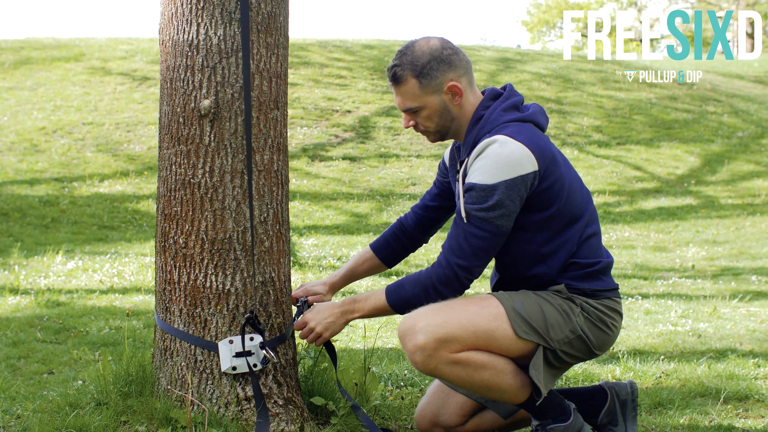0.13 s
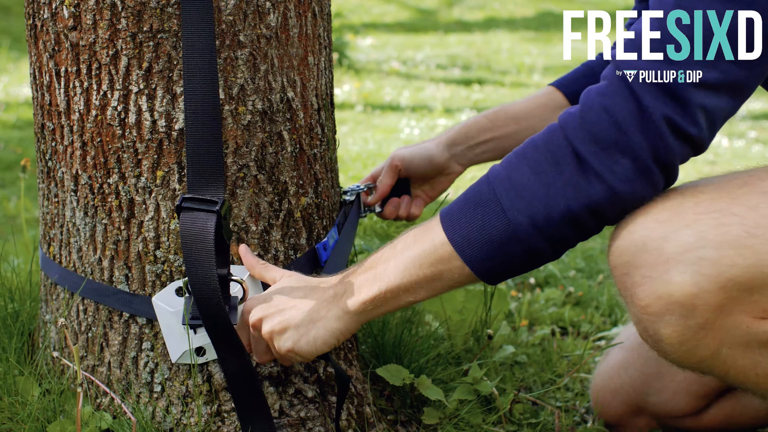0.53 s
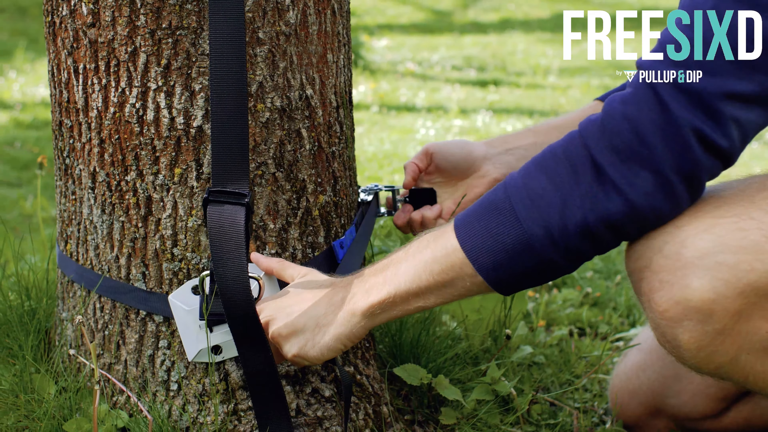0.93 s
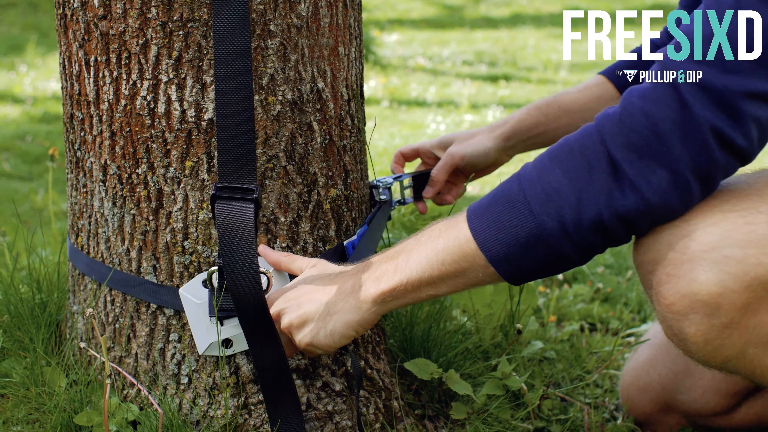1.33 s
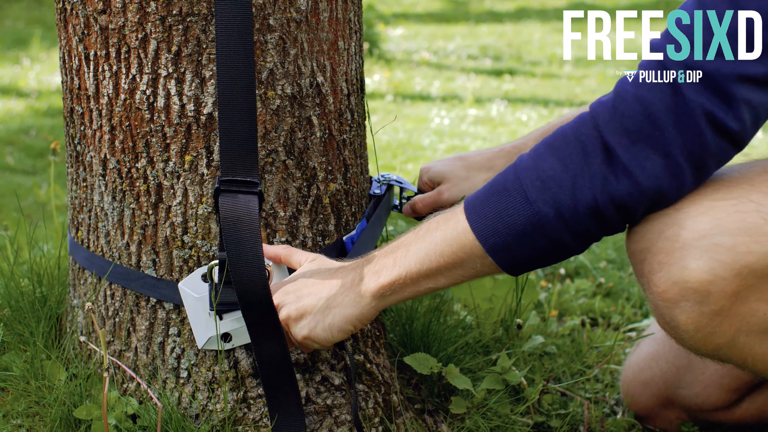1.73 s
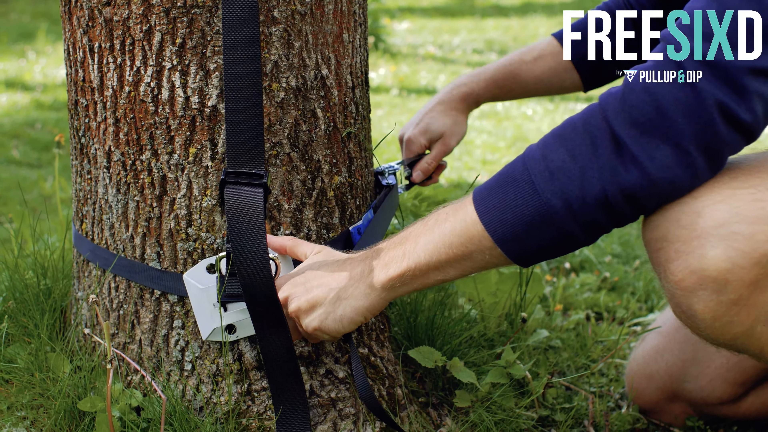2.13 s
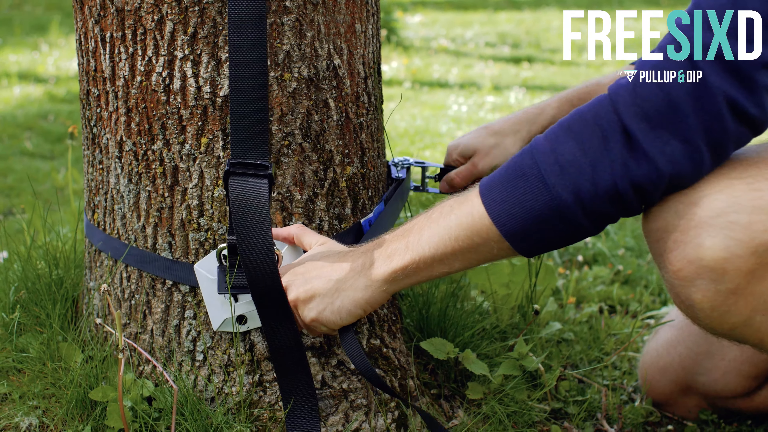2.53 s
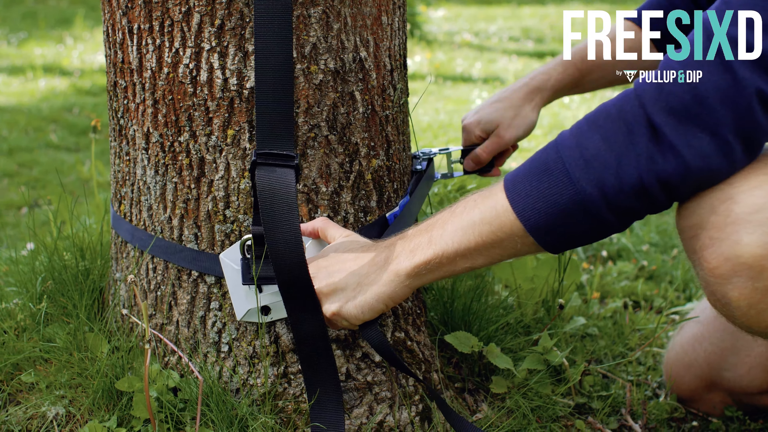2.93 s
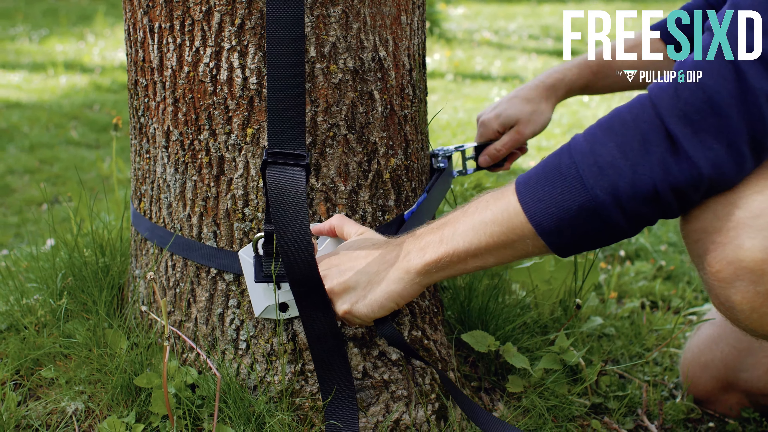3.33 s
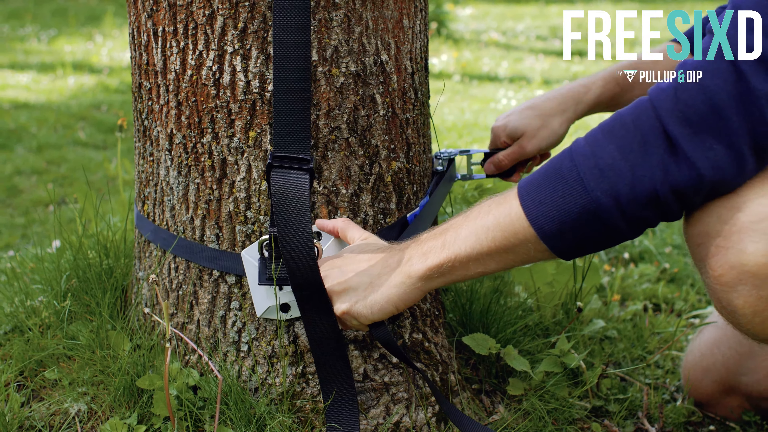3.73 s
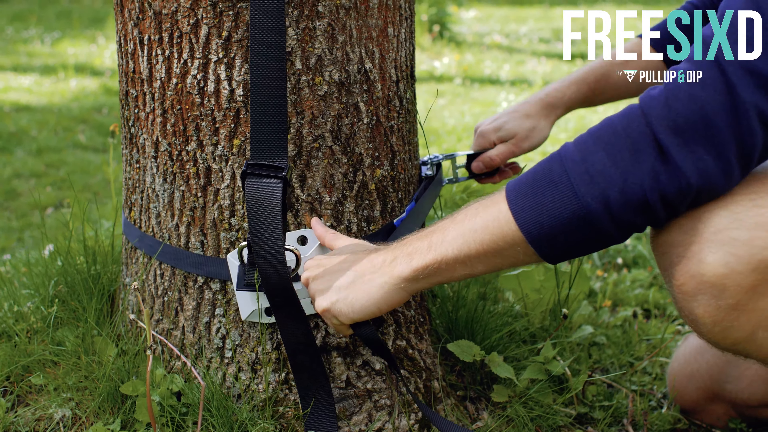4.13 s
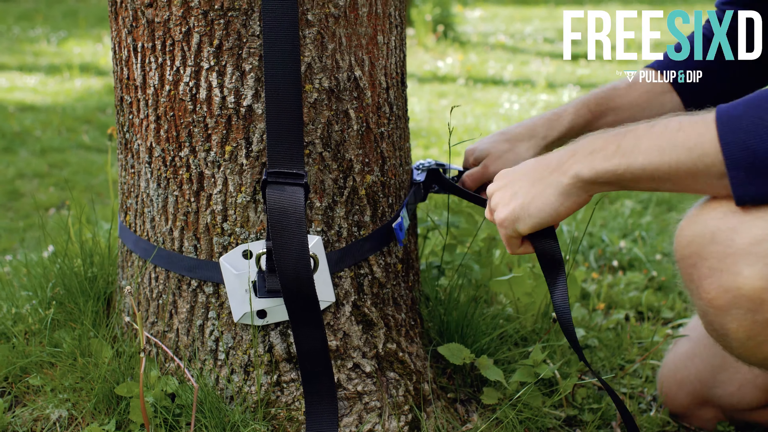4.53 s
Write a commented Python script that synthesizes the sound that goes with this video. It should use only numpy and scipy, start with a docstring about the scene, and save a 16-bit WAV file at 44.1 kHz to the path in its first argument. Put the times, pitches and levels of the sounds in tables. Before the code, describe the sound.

A steel ratchet tightens a webbing strap round a tree trunk on a lawn. Faint ticks come first, then sharp, rattling clicks in short bursts, about three a second, with a few brief squeaks from the dry pivot. The clicking thins to softer clicks and finger knocks near the end. The ratchet sounds close, over quiet strap rustle, soft handling thumps, low wind on the microphone and a distant hum.

```python
"""A steel ratchet is cranked on a webbing strap round a tree trunk, outdoors on a lawn.
Distant hum, wind rumble, soft thumps of puffs and handling, and rustling webbing run throughout.
Faint ticks come first; a loose metal part tinks at 0.8 s, then the pawl snaps over the teeth in short
rattling bursts. From 2.7 s the dry pivot squeaks now and then. Fingers knock on the strap at 3.6 s;
the part tinks again at 4.4 s. Near 5 s the wind swells; soft clicks, knocks and a squeak follow."""
import sys
import numpy as np
from scipy import signal
from scipy.fft import rfft, irfft, next_fast_len
from scipy.io import wavfile
from scipy.ndimage import uniform_filter1d

SR = 44100
rng = np.random.default_rng(int(sys.argv[2]) if len(sys.argv) > 2 else 0)


def waveform_to_disk(signal):
    """Save audio, clipped to [-1, 1], as 16-bit WAV at the path in sys.argv[1]."""
    frames = np.transpose(np.atleast_2d(signal))
    scaled = np.clip(frames, -1, 1) * 32767
    samples = np.round(scaled).astype(np.int16)
    wavfile.write(sys.argv[1], SR, samples)


N = 246466


def amp(db):
    """Decibels to gain."""
    return 10 ** (np.asarray(db) / 20)


def rms_one(x):
    """Scale to unit rms."""
    return x / np.sqrt(np.mean(x ** 2) + 1e-20)


def level(rows, column=1):
    """One dB column of a (seconds, dB, ..) curve as gain per sample."""
    columns = np.transpose(rows)
    return amp(np.interp(np.arange(N) / SR, columns[0], columns[column]))


def shape(spectrum, hz):
    """Gain of a (Hz, dB) spectrum at given frequencies."""
    knots_hz, db = np.transpose(spectrum)
    return amp(np.interp(np.log(np.maximum(hz, 1)), np.log(knots_hz), db))


def coloured(noise, spectrum):
    """Noise filtered to a (Hz, dB) spectrum; unit rms."""
    size = next_fast_len(N)
    gain = shape(spectrum, np.fft.rfftfreq(size, 1 / SR))
    return rms_one(irfft(rfft(noise, size) * gain, size)[:N])


def drift(corner_hz, count=N):
    """Random wander: noise through two one-pole low-passes; unit rms."""
    r = np.exp(-2 * np.pi * corner_hz / SR)
    noise = rng.standard_normal(count + SR // 2)
    return rms_one(signal.lfilter([1], [1, -2 * r, r * r], noise)[SR // 2:])


def ring(x, hz, t60_s):
    """Damped mode: a unit click starts a decaying unit sine."""
    r = amp(-60 / (t60_s * SR))
    w = 2 * np.pi * min(hz, .45 * SR) / SR
    return signal.lfilter([0, np.sin(w)], [1, -2 * r * np.cos(w), r * r], x + 1e-18)


def open_air():
    """Distant hum and hiss, wavering slightly."""
    # Hum over time. Each row: time in seconds, level in dB.
    hum_levels = [(0, -55), (.92, -51), (1.67, -53), (3.08, -53), (3.8, -52), (5.07, -53.5), (5.59, -52)]
    # Hum spectrum. Each row: frequency in Hz, relative density in dB.
    hum_spectrum = [(13, -54.5), (22, -25.5), (149, -1.5), (415, -3), (721, -3.5), (1010, -5), (1520, -15),
                    (4370, -33), (13200, -41.5), (15200, -44.5), (16500, -53.5)]
    return level(hum_levels) * amp(0.88 * drift(12.0)) * coloured(rng.standard_normal(N), hum_spectrum)


def wind_and_handling(thump_sigma_s=0.019, gust_spread_db=0, flutter_db=0.5):
    """Low wind rumble on the microphone, with short soft thumps from puffs and from handling the ratchet."""
    # Wind strength. Each row: time in seconds, level in dB.
    gust_levels = [(0, -58), (.5, -61), (1.3, -57), (2.5, -60), (3.05, -58.5), (3.5, -46.5), (3.95, -56),
                   (4.45, -52.5), (4.7, -47), (5.05, -42.5), (5.2, -52), (5.4, -46), (5.59, -47.5)]
    # Wind puffs and handling thumps. Each row: centre in seconds, level in dB.
    thump_levels = [(.16, -54), (.54, -57), (.78, -43.5), (1.19, -54), (1.63, -53), (1.91, -60),
                    (2.02, -56), (2.13, -51), (2.211, -44.5), (2.35, -45), (2.664, -41), (2.75, -48.5),
                    (3.17, -58), (3.27, -56), (3.35, -42.5), (3.67, -48), (4.055, -52.5), (4.266, -51),
                    (4.52, -59), (4.565, -49), (4.69, -45), (5.01, -49.5), (5.354, -33.5), (5.45, -45)]
    # Rumble spectrum. Each row: frequency in Hz, relative density in dB.
    rumble_spectrum = [(18, -60), (30, -30.5), (104, -3), (130, 1), (241, 0), (335, -7.5), (367, -11.5),
                       (510, -12.5), (700, -22), (910, -52), (1540, -120)]
    t = np.arange(N) / SR
    thumps = sum(amp(db) * np.exp(-.5 * ((t - s) / thump_sigma_s) ** 2) for s, db in thump_levels)
    gusts = level(gust_levels) * amp(gust_spread_db * drift(4.9))
    flutter = amp(flutter_db * drift(42))
    return (gusts + thumps) * flutter * coloured(rng.standard_normal(N), rumble_spectrum)


def webbing():
    """Rubbed fibres: a dull grainy scrape and a smoother bright hiss flutter together."""
    # Rustle over time. Each row: time in seconds, scrape in dB, hiss in dB.
    rustle_levels = [(0, -67.5, -67.5), (.3, -67, -72.5), (.72, -69.5, -74), (1.01, -65, -71),
                     (1.15, -70.5, -77), (1.28, -60, -64), (1.43, -67.5, -73), (2.25, -64, -71),
                     (2.35, -54, -69), (2.55, -58.5, -66), (2.72, -65.5, -72.5), (3.11, -69, -73),
                     (3.72, -68.5, -74), (3.85, -60.5, -67.5), (4.1, -65, -67.5), (4.3, -60.5, -65.5),
                     (4.67, -65, -69), (4.95, -71, -73), (5.21, -65, -74.5), (5.59, -58.5, -68)]
    # Scrape and hiss spectra. Each row: frequency in Hz, relative density in dB.
    scrape_spectrum = [(1300, -22.5), (2000, 0.5), (2500, 0.5), (3100, -0.5), (4000, -1), (4800, -2),
                       (5600, -7), (7500, -29.5)]
    hiss_spectrum = [(4000, -30), (5800, 4), (6600, 1.5), (10000, -4.5), (14500, -6.5), (16000, -13),
                     (16600, -33.5)]
    scrape = coloured(rng.standard_normal(N) * amp(2.9 * drift(320)), scrape_spectrum)
    hiss = coloured(rng.standard_normal(N) * amp(1.49 * drift(300)), hiss_spectrum)
    flutter = amp(0.81 * drift(30))
    return flutter * (level(rustle_levels, column=1) * scrape + level(rustle_levels, column=2) * hiss)


def finger_knocks():
    """Fingers on the strap: each dull knock swells and dies in a cycle or two."""
    # Each row: time in seconds, peak in dB, pitch in Hz.
    knocks = [(3.6225, -31.5, 870), (3.6263, -37, 450), (3.6305, -37, 1200), (3.648, -40, 900),
              (3.671, -42, 169), (3.694, -33, 230), (5.2767, -30, 905), (5.2800, -31, 1110),
              (5.3357, -36, 229), (5.407, -39, 1600), (5.4417, -27, 237)]
    out = np.zeros(N)
    for s, db, hz in knocks:
        reach = round(2 * SR / hz)
        at = round(s * SR) + np.arange(-reach, reach)
        cycles = (at / SR - s) * hz - .5
        out[at] -= amp(db) * np.cos(2 * np.pi * cycles) * np.exp(-(cycles / 0.57) ** 2)
    return out


def loose_part(scuff_t60_s=0.0012):
    """Light scuffing touches ring a thin metal part in a few clear modes."""
    # Each entry: time of a touch in seconds.
    tinks_s = [0.8345, 4.4135]
    # Each row: mode in Hz, t60 in seconds, strength in dB in the first tink, in the second.
    modes = [(2646, 0.05, -37, -38.5), (3100, 0.44, -67, -53.5), (5170, 0.085, -42.5, -35.5),
             (5370, 0.029, -36, -70.5), (6050, 0.1, -40, -64), (6640, 0.023, -43, -76),
             (7160, 0.1, -68, -53.5), (7400, .15, -63, -61), (9760, 0.053, -61, -54)]
    t = np.arange(300) / SR
    scuff = amp(-60 * t / scuff_t60_s)
    out = np.zeros(N)
    for hz, t60_s, *strength_db in modes:
        touches = np.zeros(N)
        touches[[round(s * SR) for s in tinks_s]] = amp(strength_db)
        swing = np.cos(2 * np.pi * hz * t) * scuff   # finite contact: the ring swells in
        force = signal.lfilter(2 * swing / scuff.sum(), [1], touches)
        out += ring(force, hz, t60_s) * amp(2.3 * drift(150))
    return out


def pivot(swell_db=25):
    """Stick-slip in the dry pivot: wavering harmonics and friction hiss swell and fade."""
    # Each row: start, loudest moment and end in seconds, slip rate in Hz at each of the three,
    # gain in dB, roughness in dB, relative hiss in dB.
    squeaks = [(2.660, 2.668, 2.676, 3020, 2700, 2800, -16, 4.5, -28),
               (3.986, 3.999, 4.027, 2060, 2180, 2530, -33, 5.5, -23),
               (4.558, 4.576, 4.586, 1690, 1634, 2100, -29.5, 1.5, -15),
               (5.314, 5.332, 5.354, 2560, 2420, 2240, -21, 2, -24)]
    # Each row: relative levels in dB of harmonics 1-8 of one squeak.
    harmonics_db = [ (-16.5, 2, -26.5, -6, -19.5, -31, -42.5, -39),
                    (-42, 2.5, -28, -7.5, -31, -19, -30, -30.5), (-19, -7.5, -9, 0, -1, -6, -8, -15),
                    (-41, 2, -25, -13, -31, -28, -39, -37.5), ]
    out = np.zeros(N)
    for squeak, levels_db in zip(squeaks, harmonics_db):
        start_s, loudest_s, end_s, start_hz, loudest_hz, end_hz, gain_db, rough_db, hiss_db = squeak
        at = np.arange(round(start_s * SR), round(end_s * SR))
        off_peak = np.interp(at / SR, [start_s, loudest_s, end_s], [1, 0, 1]) ** 2
        edge_hz = np.where(at / SR < loudest_s, start_hz, end_hz)
        slip_hz = loudest_hz + off_peak * (edge_hz - loudest_hz)
        jitter = 1 + 0.0042 * rough_db * drift(300, len(at))
        phase = 2 * np.pi * np.cumsum(slip_hz * jitter) / SR
        tone = np.zeros(len(at))
        for k, db in enumerate(levels_db, start=1):
            strength = amp(db + rough_db * drift(196, len(at)))
            tone += strength * np.sin(k * phase + rng.uniform(0, 2 * np.pi))
        hiss = amp(hiss_db) * np.diff(rng.standard_normal(len(at) + 1))
        envelope = signal.windows.tukey(len(at), .15) * amp(gain_db - swell_db * off_peak)
        out[at] += envelope * (tone + hiss)
    return out


def pawl(rise_sigma_ms=1.06, crack_db=-6, rattle_db=-28, rattle_t60_s=0.082, low_cut_hz=1870):
    """Each snap over a tooth is a swarm of tiny steel contacts that rings the frame."""
    # Each row: time in seconds, peak in dB, low-band gain in dB, low ring in Hz,
    # high-band gain in dB, main ring in Hz, contact t60 in ms.
    snaps = [(.0923,-50,-7,2580,7,6600,16),(.1029,-53,-7,2100,-3,4760,16),(.16,-50,-10,2580,-13,4950,16),(.194,-43,-16,2400,1,10800,8),
             (.2477,-50,2,3210,-4,5080,18),(.2764,-49,5,3100,-15,4250,23),(.3056,-48,2,2800,-3,4500,27),(.3688,-49,7,2750,-10,4180,8),
             (.4496,-43,12,2720,0,3780,40),(.4941,-46,1,2510,-10,4670,11),(.6685,-48,9,3110,-6,5300,35),(.9118,-48,-9,2140,-5,8370,35),(.917,-39,-12,2480,4,6750,11),
             (.955,-19.5,-7,2470,1,6760,5.4),(0.9633,-8,-5.5,2550,3.5,6500,10),(0.9663,-8,-10.5,2630,5,5000,11.6),(.9993,-39,-2,2650,-13,4710,35),
             (1.0064,-30,-3,2730,-4.5,4780,12),(1.014,-38,-6,2310,-16,4770,9),(1.0346,-23,-6,2630,-3,6750,20),(1.0425,-9.5,-6,3330,11,6530,14),
             (1.0453,-2,-9.5,2740,-6.5,6710,11),(1.0984,-43,0,2550,-26,4700,13),(1.194,-42.5,-10,2810,-1,4680,16),(1.2103,-42.5,-7,3050,-11,4800,19),
             (1.2361,-33,-5,2870,-2.5,5190,35),(1.2506,-31,-4,2810,-1,4650,16),(1.2592,-30,-5,2180,-5,4650,16),(1.291,-38.5,7.5,2570,3,5000,45),
             (1.338,.5,-9,2830,3,4720,12.3),(1.408,-31,-4,2580,-2,3960,23),(1.421,-37,-3,2560,7,6230,33),(1.4459,-15.5,-8,2440,0,4830,11),
             (1.4477,-10,0.5,2370,2,9200,11),(1.451,-11.5,-1.5,2300,6,8600,13),(1.509,-33.5,-3,2120,1,7260,14),(1.5402,-27.5,1,2530,-7,6160,14),
             (1.5485,-27,-6,2530,-4,6740,34),(1.648,-18.5,-0.5,1960,4.5,4800,31),(1.655,-7.5,-4,2240,0,7800,16),(1.731,-42,13,2140,-19,4450,32),
             (1.7429,-13.5,0,3270,3.5,4840,9.2),(1.748,-16.5,-4,3270,-8,4590,14),(1.7597,-14.5,-12.5,2530,-8,4600,16),(1.873,-28,-3.5,3120,-7,4760,18),
             (1.8847,-35.5,1,3300,1,4300,8),(1.898,-35,-3,2160,-7,4740,8),(1.903,-39,6,3300,-2,4730,15),(1.9858,-12.5,-3.5,2630,3,4970,16),
             (1.9897,-15,-2,2570,2,4820,9.8),(1.9956,-11,-3,2500,0,10900,26),(2.028,-39,5,3290,-15,4860,21),(2.059,-11,-6.5,2160,1,5430,14),
             (2.0623,-7,-2.5,2220,-1,10420,28),(2.2453,-38,1.5,2490,-1,7840,17),(2.2744,-44,9,2440,-4,4760,35),(2.286,-36.5,7,2700,1,4300,24),(2.2967,-25,-4,2360,-4,9200,31),
             (2.319,-35.5,6,2360,0,7560,35),(2.3286,-33.5,6,2450,-11,4800,25),(2.339,-29,4,2500,-19,6100,16),(2.344,-19,-8,2510,-13,6330,16),
             (2.3473,-15.5,-3,2730,9,7600,9.8),(2.3497,-5.5,-6,2740,2.5,7600,16),(2.3794,-45,6,2110,-16,4760,22),(2.41,-27.5,10,2640,-15,4690,25),(2.42,-11,-6.5,2830,3.5,7960,12),
             (2.4272,-16.5,-11,2970,-7,4440,15),(2.528,-34.5,-5,2430,-10,4690,20),(2.541,-38,-3,3200,-10,4510,16),(2.549,-38.5,11,2130,0,6270,17),
             (2.571,-33.5,-6,2250,-1,4900,11.5),(2.5796,-41.5,-4,2500,-16,4630,10),(2.6477,.5,-8,2100,-1.5,8570,11.6),(2.6561,-23,-2.5,2160,-1.5,5880,16),
             (2.692,-2.5,-1.5,2650,2.5,10100,13),(2.7995,-44,12.5,3140,-17.5,3520,6.4),(2.876,-51,-8,2500,-5,4700,8.4),(2.92,-46.5,-6,2150,-1,5970,33),(2.9375,-38,3,2630,-4,5840,12),
             (2.97,-19.5,-7.5,2830,2.5,8800,13),(2.98,-25,-6,2960,-7,7800,25),(2.9975,-30,10,2100,-2,4830,53),(3.013,-24,5,3120,0,8300,17),
             (3.017,-17,-15,2960,1,8330,12),(3.02,-7,-15,3000,1,8650,15),(3.0434,-36.5,3,2120,-11,4660,13),(3.075,-47,-4,2010,-8,4770,15),(3.0976,-28,2,1960,-12,6610,38),(3.104,-10.5,-6,2200,-4,6480,13),
             (3.109,-14,-18,3100,-22,4430,14),(3.1164,-10.5,-6,2810,-6,4600,13),(3.2192,-33,-6,2630,-18,4630,21),(3.2434,-42,-8.5,2540,-21,4730,26),
             (3.257,-24,-4,2830,-8.5,4730,13),(3.2672,-29,-12,3200,-18,4530,7),(3.2743,-34,1,3210,-8,4550,9),(3.3637,-10,-1.5,2610,6,8060,19),
             (3.3659,-1,-4,2600,-4,7920,14),(3.4543,-14.5,7.5,1980,5,5900,22),(3.4574,-13.5,10,2650,-8,6150,7.6),(3.4627,-13,-1,2510,-4,8030,27),
             (3.6366,-33,-3,2140,-4.5,5930,17),(3.6685,-37,1,2090,4,6580,16),(3.6721,-36,3,2520,0,6440,14),(3.696,-32.5,5,2150,-5,6100,7.4),
             (3.7032,-40.5,6,2990,-13,6400,15),(3.751,-47,18,3070,-6,3820,35),(3.762,-32,12.5,2200,-7,5150,10),(3.7884,-41,23,2100,-6,6200,31),(3.797,-19,-5,3050,-4,6500,26),
             (3.8041,-6,-6,2270,0,6680,13),(3.8573,-17,-6,2960,-13,6250,20),(3.866,-11,-10.5,2880,-3,8540,21),(3.871,-15,-6,2530,-20,8440,10),
             (3.881,-20,-2,2690,0,4700,18),(4.0005,-34,-16,2580,-12,4390,14),(4.006,-29.5,3,2580,-11.5,4600,13),(4.0264,-40,-3,2510,-5,4720,18),
             (4.044,-35.5,2,2830,-2.5,6900,8.4),(4.1351,-43,-2,2570,-6,7560,16),(4.1576,-7.5,-1,2440,3.5,10800,12),(4.1614,-5.5,-15.5,2380,-4.5,10960,12),
             (4.499,-35,-9,2020,-2,4500,35),(4.504,-29,-9,3050,10,8900,7),(4.5114,-21.5,-2,2410,4,10500,18),(4.514,-19,-6,2500,1,6710,21),
             (4.543,-36,5,2130,-10,5810,12),(4.561,-30.5,12,2050,-10,6550,16),(4.5895,-31.5,7,2420,-6,5700,26),(4.599,-12,0,2400,1.5,8350,9.7),
             (4.6038,-17,-7.5,2500,-6,4570,37),(4.61,-10,-5,2400,4,8280,17),(4.7546,-18.5,-4.5,2700,3.5,6300,11.5),(4.7744,-41.5,-12,3240,0,5750,32),
             (4.804,-48,-1.5,2750,-4,6300,14),(5.2623,-40.5,14,2600,-17,5720,11),(5.2758,-28.5,8,2700,0.5,6660,16),(5.3084,-24.5,-17,2630,0,9200,11),
             (5.3256,-23.5,-28,2550,-20,4880,16),(5.358,-33,-1,2650,3.5,4700,20),(5.3657,-30,-22,2690,-2,5200,10),(5.374,-23,1,2470,-1.5,7450,21),
             (5.437,-39.5,-3.5,2120,-24,5000,17)]
    # Ratchet frame. Each row: mode in Hz, bandwidth in Hz, mean gain in dB.
    frame_modes = [(2580, 120, -4.5), (4804, 400, 0), (6480, 890, -2), (8030, 850, -3.5), (8890, 300, -5),
                   (10650, 91, -0.5), (13700, 69, -9.5), (14870, 130, -7), (16924, 250, -5)]
    size, lead = 4096, 512   # samples
    t = (np.arange(size) - lead) / SR
    hz = np.fft.rfftfreq(size, 1 / SR)

    def resonance(centre_hz, width_hz, db):
        """Complex response of one damped mode."""
        return amp(db) / (1 + 2j * (hz - centre_hz) / width_hz)

    modes = np.array([resonance(*mode) for mode in frame_modes])
    # Small parts radiate no bass.
    radiation = signal.freqs(*signal.butter(6, low_cut_hz, "high", analog=True), hz)[1]
    rise = np.exp(-.5 * (1e3 * t / rise_sigma_ms) ** 2)
    rattle = amp(rattle_db - 60 * t / rattle_t60_s)   # loose parts linger
    out = np.zeros(N + size)
    for s, peak_db, low_db, low_hz, high_db, main_hz, t60_ms in snaps:
        contacts = rng.standard_normal(size)
        contacts *= amp(10.9 * uniform_filter1d(rng.standard_normal(size), size=9))   # uneven clumps
        fall = amp(-60e3 * t / max(t60_ms, 3)) + rattle
        envelope = np.where(t < 0, rise, fall)
        rings = resonance(main_hz, width_hz=320, db=8) + resonance(low_hz, width_hz=260, db=5.5)
        mode_gains = amp(4.5 * rng.standard_normal(len(modes)))
        body = amp(crack_db) + rings + mode_gains @ modes
        tilt = shape([(2300, low_db), (4800, 0), (7500, 0), (12000, high_db)], hz)
        snap = irfft(rfft(contacts * envelope) * body * tilt * radiation, size)
        start = round(s * SR) - lead
        out[start:start + size] += amp(peak_db) * snap / np.abs(snap).max()
    return out[:N]


def scene():
    """Ratchet and strap over wind, handling thumps and distant hum; mono."""
    ratchet = pawl() + pivot() + loose_part()
    return (ratchet + finger_knocks() + webbing() + wind_and_handling() + open_air())[None]


def record(dry, low_cut_hz=45, ceiling=.82, stopband_hz=17000):
    """Microphone: deep bass cut, peaks rounded, top cut steeply."""
    dry = signal.sosfilt(signal.butter(2, low_cut_hz, "high", fs=SR, output="sos"), dry)
    rounded = dry / (1 + np.abs(dry / ceiling) ** 10) ** .1
    return signal.sosfilt(signal.cheby2(12, 70, stopband_hz, fs=SR, output="sos"), rounded)


dry = scene()
out = record(dry)
waveform_to_disk(out)
```